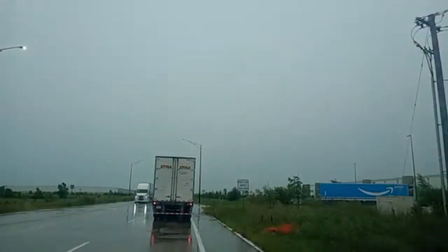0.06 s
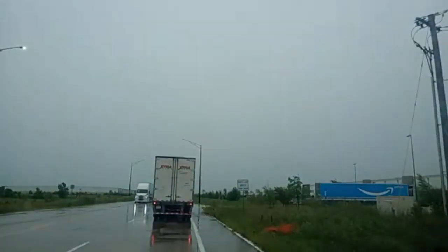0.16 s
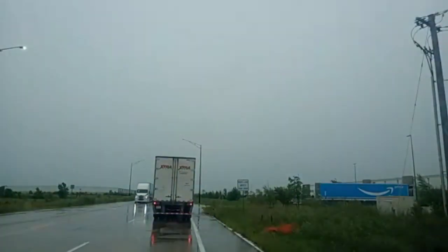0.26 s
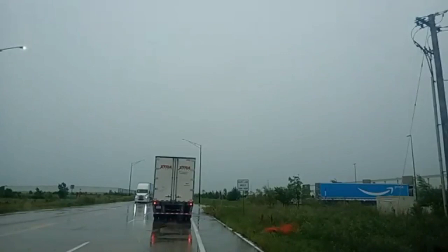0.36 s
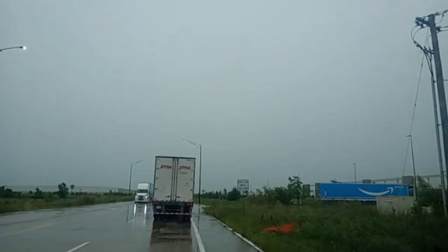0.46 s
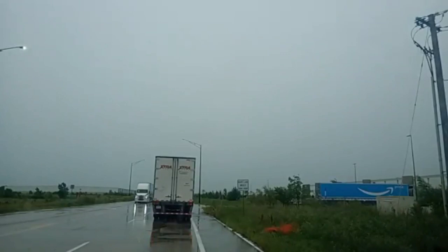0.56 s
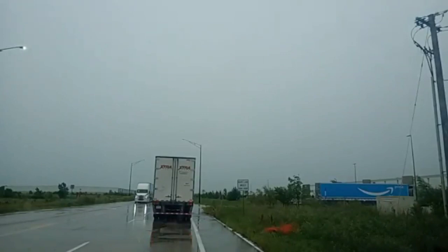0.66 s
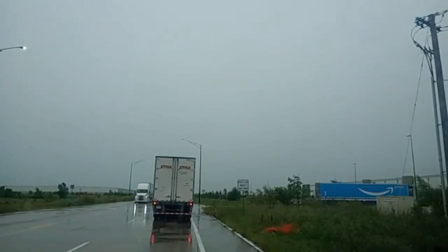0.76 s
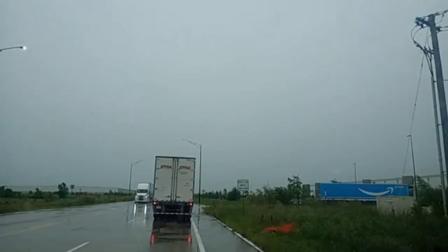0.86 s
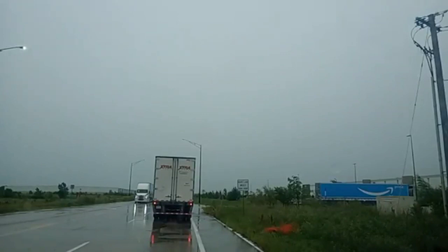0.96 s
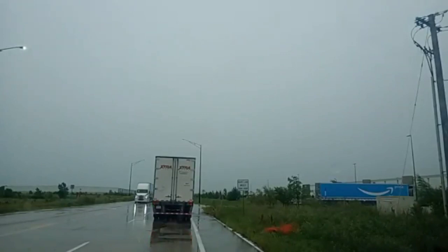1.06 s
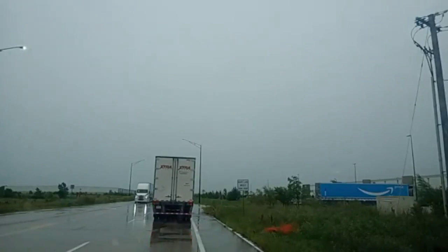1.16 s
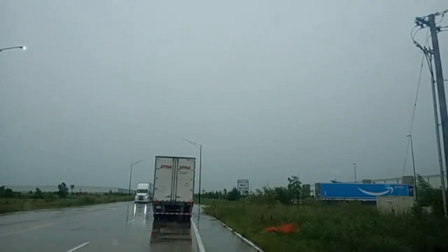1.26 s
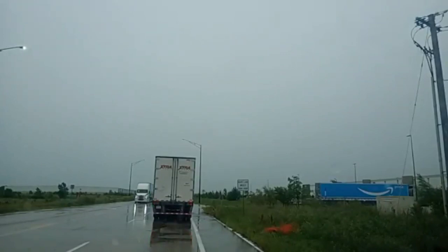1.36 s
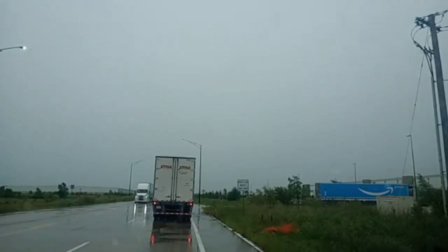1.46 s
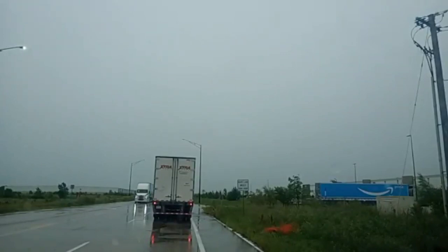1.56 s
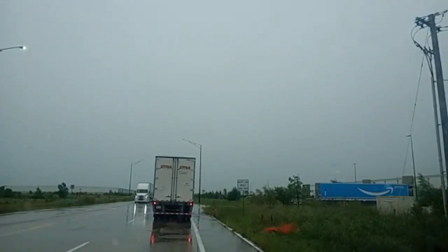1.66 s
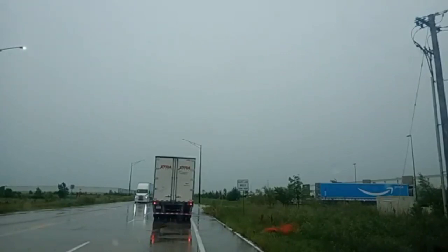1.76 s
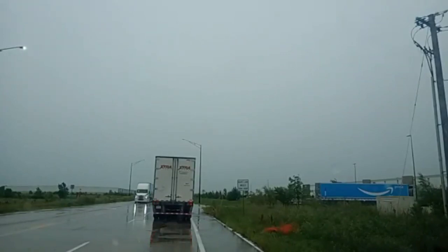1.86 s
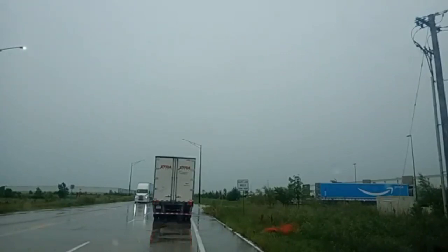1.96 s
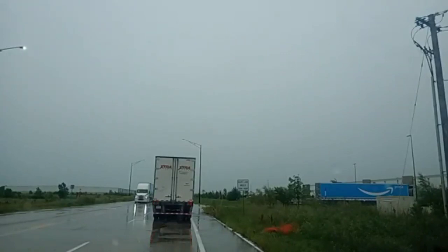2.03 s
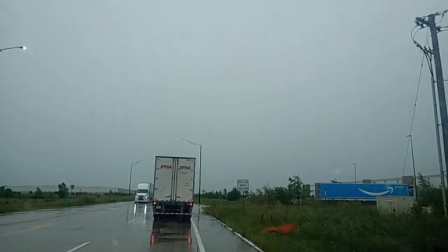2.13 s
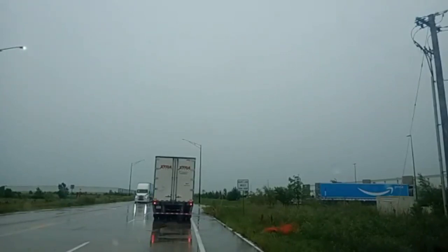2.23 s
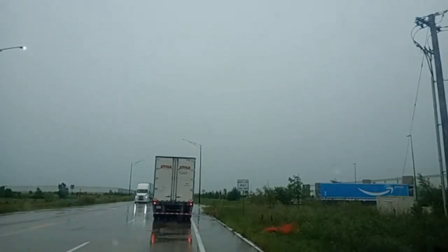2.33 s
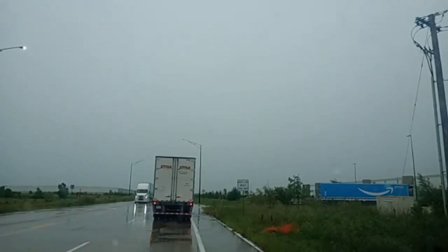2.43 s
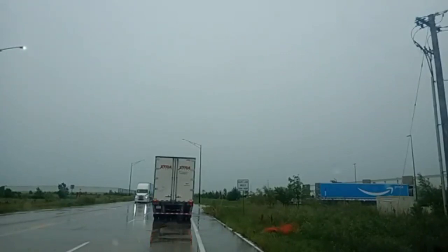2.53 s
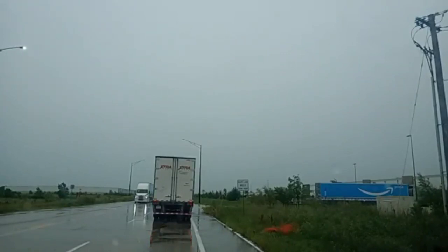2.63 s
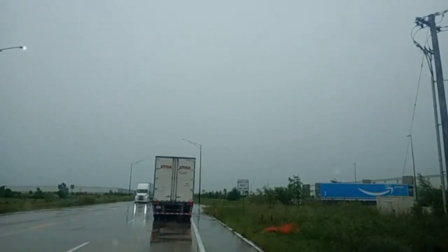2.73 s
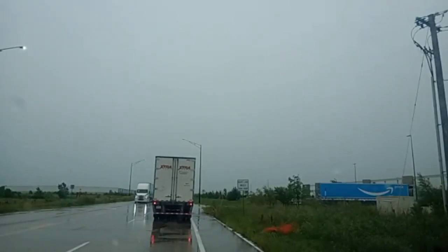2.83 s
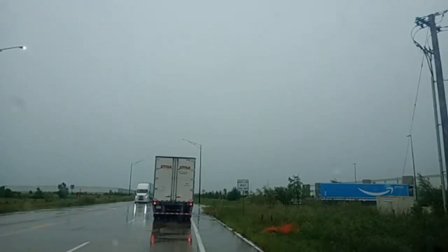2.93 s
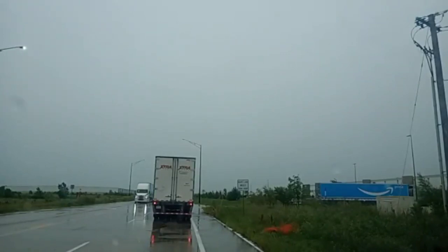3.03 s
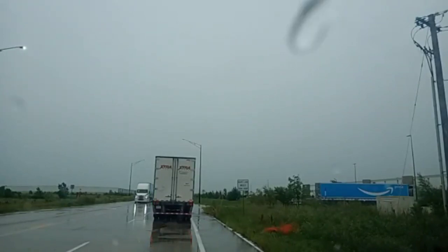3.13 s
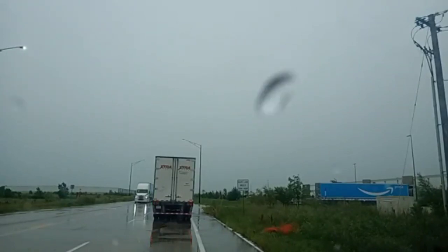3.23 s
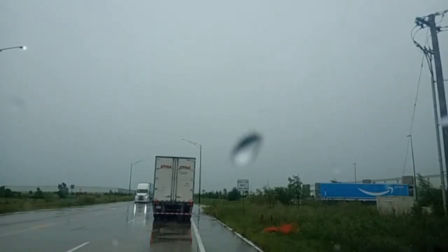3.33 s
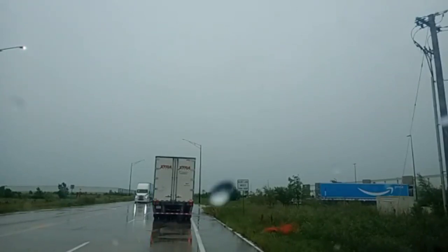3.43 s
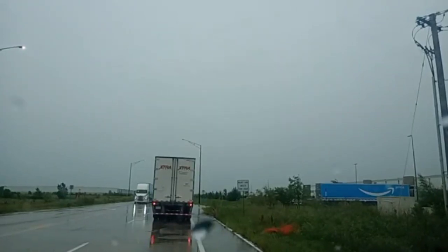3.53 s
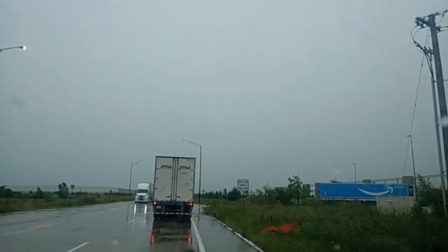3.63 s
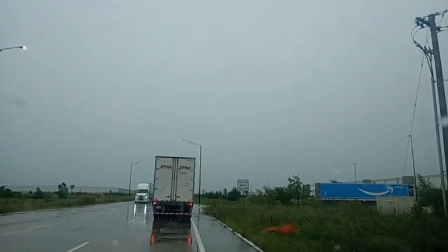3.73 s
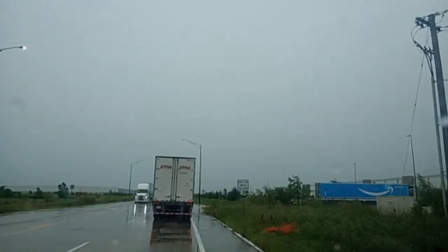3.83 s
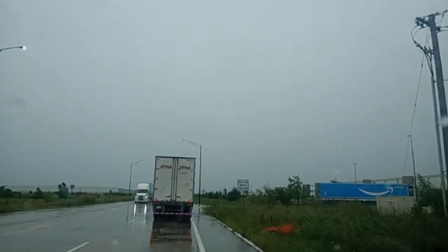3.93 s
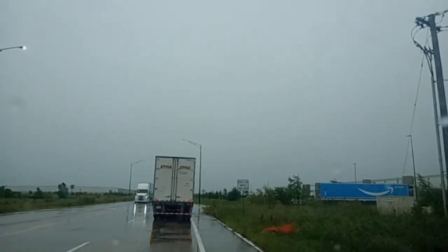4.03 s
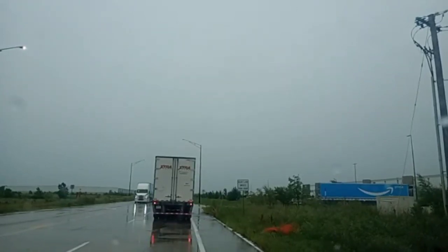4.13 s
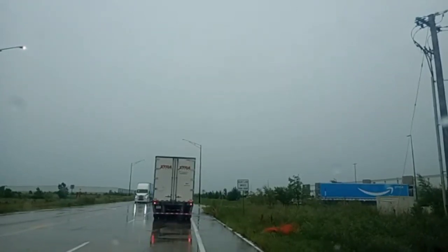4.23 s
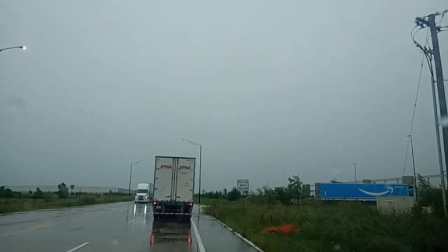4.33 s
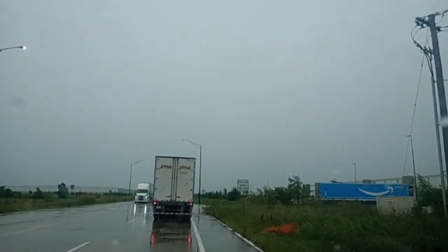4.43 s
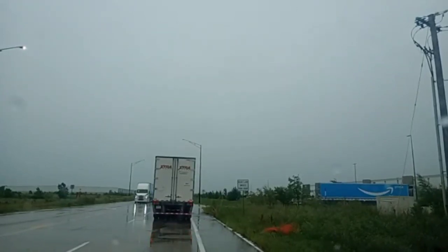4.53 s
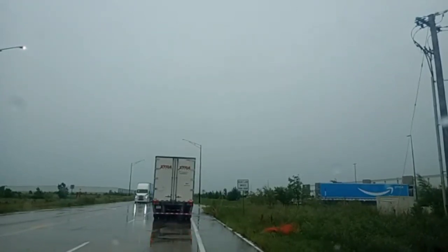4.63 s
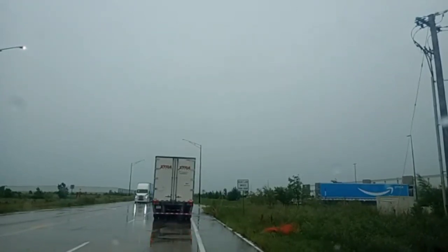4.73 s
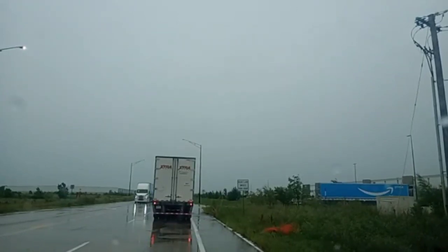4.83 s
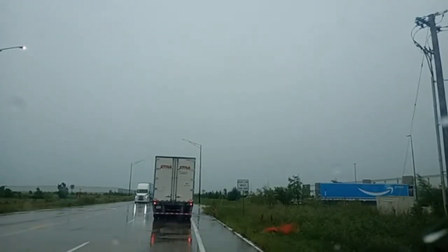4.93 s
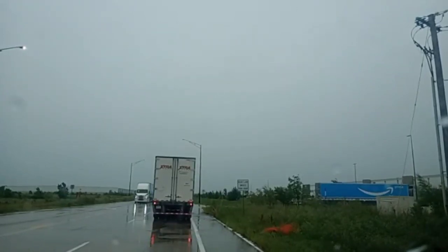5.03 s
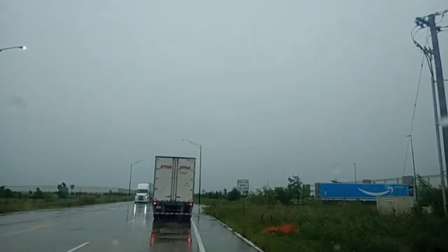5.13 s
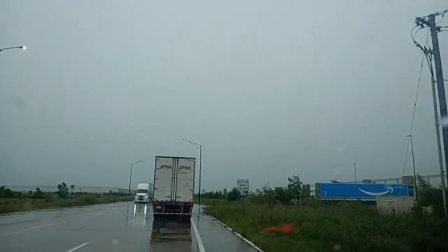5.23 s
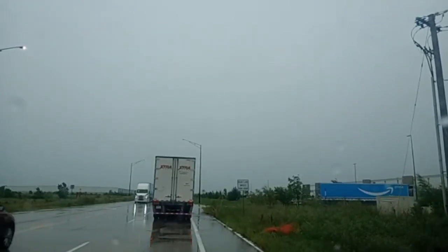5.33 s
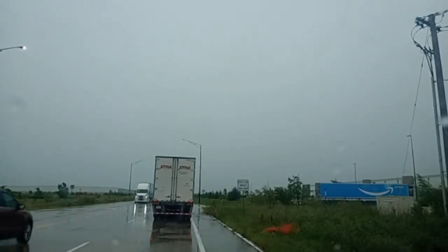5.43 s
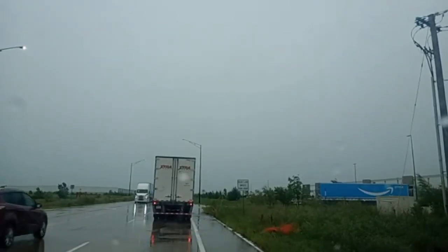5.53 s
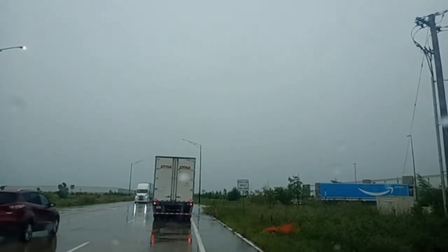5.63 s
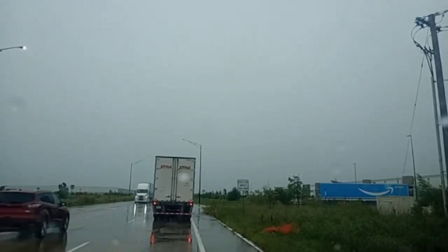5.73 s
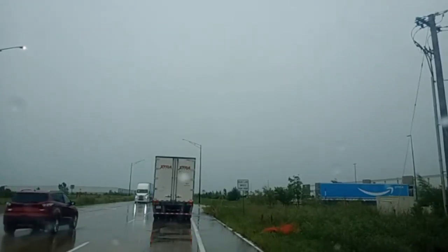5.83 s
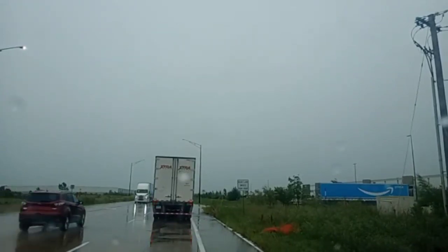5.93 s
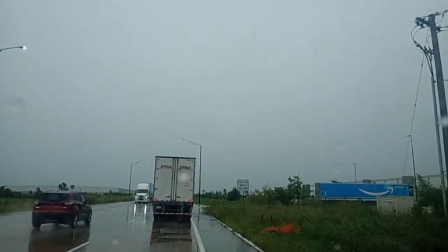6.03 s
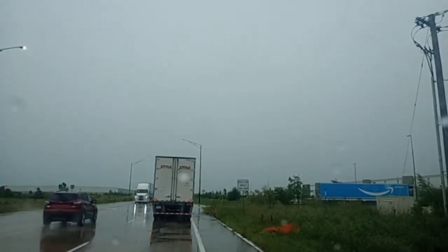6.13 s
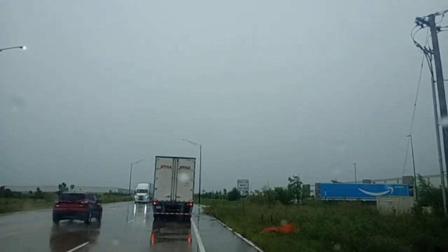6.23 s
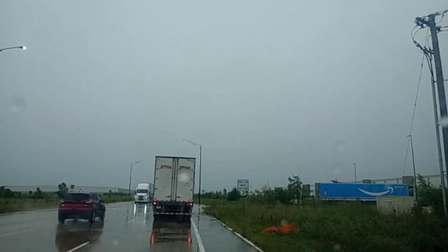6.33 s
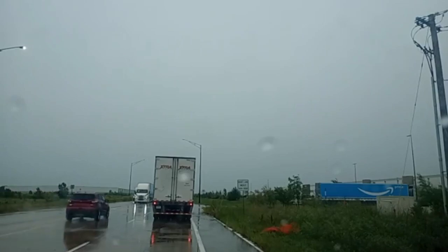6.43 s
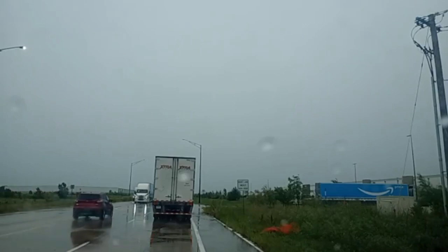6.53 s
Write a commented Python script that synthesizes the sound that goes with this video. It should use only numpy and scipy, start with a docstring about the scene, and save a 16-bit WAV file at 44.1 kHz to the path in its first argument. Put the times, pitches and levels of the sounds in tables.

```python
"""A wiper blade judders to rest and the cowl thrums out, heard inside a parked car in light rain;
then drops tap the windshield over a thin patter and the low murmur of the cabin.
The blade is a stick-slip pulse train driving body resonances; each drop is a short push that rings
glass modes and shapes noise; the patter and murmur are speckled noise with drawn levels.
A small microphone hears little above 7 kHz."""
import sys
import numpy as np
from scipy import signal
from scipy.fft import rfft, irfft, next_fast_len
from scipy.io import wavfile
from scipy.ndimage import uniform_filter1d, map_coordinates

SR = 44100
rng = np.random.default_rng(int(sys.argv[2]) if len(sys.argv) > 2 else 0)


def unload_audio(sound):
    """Save the sound as a 16-bit wav file, at the path given as the first command line argument."""
    columns = np.transpose(np.atleast_2d(sound))
    # keep every value between -1 and 1, then stretch to whole-number steps
    steps = np.round(np.clip(columns, -1, 1) * 32767)
    wavfile.write(sys.argv[1], SR, steps.astype(np.int16))


N = 290178
LEAD = SR // 30  # samples computed ahead of each landing

# Spectrum of drops on the glass: (frequency [Hz], relative density [dB per Hz])
GLASS = [(180, -53.5), (300, -16), (433, -17.5), (659, -10.5), (795, -12.5), (890, -7), (1030, -22.5),
         (1500, -22.5), (1800, -28), (2340, -56), (3960, -120)]
# Spectrum of splashing water: (frequency [Hz], relative density [dB per Hz])
SPLASH = [(650, -28.5), (1100, 3.5), (1580, -8), (2070, 0), (2260, 0.5), (2380, 3), (2600, -3), (2720, -2),
          (2940, -0.5), (4060, -6), (4600, -29), (5980, -42), (10100, -120)]
# Spectrum of the finest spray: (frequency [Hz], relative density [dB per Hz])
FIZZ = [(2530, -34), (4300, -13), (4430, -13.5), (4970, -17.5), (6460, -20), (10900, -120)]


def amp(db):
    """Amplitude is ten to the power of level over 20: the gain of a level in dB."""
    return 10 ** (np.asarray(db) / 20)


def unit(x):
    """Power normalisation: x at rms 1."""
    return x / np.sqrt(np.mean(x ** 2) + 1e-20)


def peak(x):
    """Short-time power normalisation: x with its loudest few milliseconds at rms 1."""
    return x / np.sqrt(np.max(uniform_filter1d(x ** 2, size=200)))


def curves(rows):
    """Linear interpolation in time: one value per sample for each column after the time."""
    times, *columns = np.transpose(rows)
    return [np.interp(np.arange(N) / SR, times, column) for column in columns]


def filtered(x, response):
    """Linear filtering: the spectrum of x times a complex response of frequency."""
    size = next_fast_len(len(x) + 4096)
    spectrum = rfft(x, size) * response(np.fft.rfftfreq(size, 1 / SR))
    return irfft(spectrum, size)[:len(x)]


def colour(points):
    """Spectral envelope: the gain of (Hz, dB) points joined on a log frequency axis."""
    f, db = np.transpose(points)
    return lambda hz: amp(np.interp(np.log(hz + 1), np.log(f + 1), db))


def spot(spectrum, uneven_db, step_hz):
    """Modal excitation depends on position: every landing spot gives the spectrum random peaks."""
    knots = rng.standard_normal(128)
    uneven = lambda hz: np.interp(hz / step_hz, np.arange(len(knots)), knots)
    return lambda hz: colour(spectrum)(hz) * amp(uneven_db * uneven(hz))


def resonant(modes):
    """Modal superposition: the causal response of (Hz, width Hz, dB) modes of alternating sign."""
    def mode(f, centre, width, db):
        return amp(db) * 1j * f * width / (centre * centre - f * f + 1j * f * width)
    return lambda f: sum((-1) ** k * mode(f, *row) for k, row in enumerate(modes))


def speckled(spectrum, patchy_db, span_hz, span_s, tick_db, ticks):
    """Superposed small taps blur into noise that ticks and holds short narrow specks; rms 1."""
    knot_positions = np.arange(N + 512) * ticks / SR  # ticks: knots per second
    beat = map_coordinates(rng.standard_normal(N // 100), [knot_positions])
    noise = amp(tick_db * beat) * rng.standard_normal(N + 512)
    z = signal.stft(noise, nperseg=512)[2]
    field = rng.standard_normal(z.shape)
    # smooth the random field over frequency, then over time
    for axis, span in enumerate((span_hz * 512 / SR, span_s * SR / 256)):
        bell = np.exp(-.5 * (np.arange(-8, 9) / span) ** 2)
        field = signal.fftconvolve(field, np.expand_dims(bell, 1 - axis), mode="same")
    patchy = signal.istft(z * amp(patchy_db * unit(field)), nperseg=512)[1][:N]
    return unit(filtered(patchy, colour(spectrum)))


def contact(rise_s, spread_s):
    """Impact force: seconds around a landing, and a push that swells, peaks and spreads away."""
    t = (np.arange(SR // 6) - LEAD) / SR
    width = np.where(t < .002, rise_s, spread_s)
    # the drop breaks up unevenly
    splinters = map_coordinates(rng.standard_normal(64), [np.clip(t * 130, 0, 60)])
    return t, np.exp(-((t - .002) / width) ** 2) * amp(2.0 * (splinters - splinters[LEAD]))


def ring(t, push, hz, waver, width_hz):
    """Forced resonance: a push of randomly walking phase drives one mode, which rings on briefly."""
    walk = np.cumsum(rng.standard_normal(len(t))) / np.sqrt(SR)
    phase = 2 * np.pi * (hz * t + rng.random()) + waver * walk  # waver: radians per root second
    return peak(filtered(push * np.sin(phase), resonant([(hz, width_hz, 0)])))


def patter():
    """Incoherent superposition: drops too small to tell apart, spray, and rain in the body shell."""
    # Levels: (time [s], patter on the glass [dB], fine spatter [dB], cabin murmur [dB])
    patter_levels = [(0.15, -69, -78, -57), (0.44, -63, -71, -65), (0.6, -67, -77, -68),
                     (0.78, -69, -75, -66), (0.95, -69, -83, -67), (1.22, -69, -70, -71),
                     (1.44, -71, -79, -73), (1.67, -66, -71.5, -70), (1.87, -71.5, -81.5, -71.5),
                     (2.12, -74.5, -77.5, -70), (2.48, -63.5, -71.5, -68), (2.76, -68, -76, -70.5),
                     (2.96, -70.5, -77.5, -68.5), (3.32, -69, -72, -66.5), (3.64, -61.5, -67.5, -63),
                     (3.82, -59.5, -67.5, -65), (4.0, -64.5, -79.5, -66), (4.27, -75, -80, -63.5),
                     (4.61, -67, -76.5, -62.5), (4.97, -71, -80, -68), (5.2, -63.5, -71.5, -71),
                     (5.38, -62, -67.5, -62), (5.61, -64, -67, -66), (5.81, -69, -66, -67.5),
                     (5.95, -63.5, -71, -61.5), (6.31, -73, -75.5, -65.5), (6.58, -69, -78.5, -72.5)]
    # Puffs of fine spray on the glass: (time [s], half length to 1/e [s], level [dB])
    sprays = [(0.457, 0.12, -80.5), (0.805, 0.072, -67), (1.192, 0.13, -85.5), (2.542, 0.022, -83),
              (3.51, 0.081, -81), (3.964, 0.15, -80), (5.35, 0.1, -81), (5.615, 0.047, -68),
              (5.741, 0.05, -67), (5.844, 0.028, -74), (6.5, .08, -94)]
    # Spectrum of the cabin murmur: (frequency [Hz], relative density [dB per Hz])
    cabin_spectrum = [(15, -45.5), (25, -7.5), (60, -11.5), (81, -12.5), (188, 6), (271, -4.5), (321, -2),
                      (366, -12), (450, -6), (580, -40.5), (990, -120)]
    mist_db, mist_grows = -87, .7  # mean level of the finest hiss, dB per dB of the spatter
    t = np.arange(N) / SR
    glass_db, splash_db, cabin_db = curves(patter_levels)
    swell_db = splash_db - splash_db.mean()
    mist = amp(mist_db + mist_grows * swell_db)
    spray = sum(amp(db) * np.exp(-((t - s) / half) ** 2) for s, half, db in sprays)
    glass = speckled(GLASS, patchy_db=3, span_hz=60, span_s=.01, tick_db=2.5, ticks=50)
    splash = speckled(SPLASH, patchy_db=3.5, span_hz=70, span_s=.007, tick_db=3.5, ticks=110)
    fizz = speckled(FIZZ, patchy_db=3, span_hz=100, span_s=.008, tick_db=3.5, ticks=120)
    cabin = speckled(cabin_spectrum, patchy_db=2.2, span_hz=50, span_s=.02, tick_db=1.5, ticks=20)
    on_glass = amp(glass_db) * glass + amp(splash_db) * splash
    return on_glass + (mist + spray) * fizz + amp(cabin_db) * cabin


def droplets():
    """Impulsive excitation: a droplet pings one high mode inside a short spatter and fizz."""
    # Landings: (time [s], level before the common trim [dB], pitch [Hz],
    #            fizz re ping and spatter [dB], spread [s])
    landings = [(0.1968, -45.5, 2450, -30, 0.0047), (0.2885, -53, 2600, -27, 0.0065),
                (0.307, -57, 1480, -7, 0.013), (0.339, -42, 3960, -12, 0.0071),
                (0.393, -46, 3480, -32, 0.011), (0.4195, -52, 3480, -22, 0.0051),
                (0.49, -58, 3120, -25, 0.009), (0.51, -47, 1480, -31, 0.0099),
                (0.537, -50, 3360, -30, 0.013), (0.6542, -46, 2236, -14, 0.024),
                (0.6907, -58, 2720, 7, 0.015), (0.7446, -51.5, 3450, -26, 0.005),
                (0.7746, -63, 4080, -12, 0.009), (0.8033, -58, 3920, 14.5, 0.0045),
                (0.853, -51, 3640, -15, 0.0096), (0.9488, -52, 3000, -26, 0.021),
                (1.0096, -57, 3440, -2.5, 0.017), (1.1057, -53, 3340, -28, 0.027),
                (1.1343, -48, 1510, -32, 0.017), (1.176, -46.5, 3300, -28, 0.017),
                (1.267, -45.5, 2750, -29.5, 0.0064), (1.3665, -56, 4100, -14, 0.0034),
                (1.3975, -52.5, 2650, -17.5, 0.0049), (1.4747, -48.5, 1307, -32, 0.023),
                (1.6052, -47, 1417, -29, 0.027), (1.6384, -48.5, 2150, -27, 0.0079),
                (1.6621, -58, 3300, -27, 0.0054), (1.6862, -53.5, 1670, -29, 0.014),
                (1.7746, -51, 1310, -24.5, 0.011), (1.791, -47.5, 2300, -29, 0.009),
                (1.8312, -57, 2470, -21.5, 0.016), (2.0093, -63, 3340, -27.5, 0.006),
                (2.0872, -57.5, 2350, -24, 0.013), (2.2192, -44, 2130, -23, 0.027),
                (2.2293, -39, 1360, -13.5, 0.0068), (2.257, -46, 1390, -40, 0.0075),
                (2.2944, -57, 2670, -17, 0.019), (2.353, -49.5, 2194, -33, 0.02),
                (2.4083, -47.5, 1476, -38, 0.017), (2.5098, -55.5, 3210, 4.5, 0.011),
                (2.5433, -48.5, 3320, -19, 0.011), (2.5916, -52, 3290, -30, 0.019),
                (2.6544, -41, 1405, -33, 0.0045), (2.7075, -46.5, 3400, -8.5, 0.0035),
                (2.7932, -57, 2710, -16.5, 0.0057), (2.9123, -54, 2550, -8.5, 0.0067),
                (3.031, -56, 1430, -17, 0.027), (3.0535, -48.5, 2910, -9, 0.0099),
                (3.1541, -40.5, 2640, -12, 0.027), (3.1736, -38.5, 1494, -14, 0.016),
                (3.1951, -42.5, 1310, -12, 0.019), (3.261, -38.5, 1270, -10, 0.0084),
                (3.3194, -62, 2160, -25, 0.008), (3.3866, -37, 1694, -32, 0.012),
                (3.4111, -41, 2300, -29, 0.015), (3.445, -46.5, 2780, -26, 0.009),
                (3.468, -39, 2740, -11, 0.003), (3.51, -60, 1950, -19, 0.009),
                (3.5425, -51, 2830, -28, 0.009), (3.5685, -46.5, 1250, -30, 0.01),
                (3.578, -42.5, 2480, -8, 0.013), (3.63, -44.5, 1316, -14, 0.009),
                (3.6585, -48, 1340, -15, 0.009), (3.6912, -46.5, 2330, -11, 0.027),
                (3.7241, -39.5, 1468, -13.5, 0.017), (3.779, -54, 1550, -29, 0.0051),
                (3.8267, -43, 1280, -33, 0.012), (3.8572, -47, 1370, -17, 0.0078),
                (3.9165, -47, 1300, -33, 0.01), (3.9496, -47.5, 1323, -26, 0.009),
                (3.9802, -39.5, 2256, -19, 0.01), (4.0362, -50, 3760, -4, 0.009),
                (4.186, -50, 2300, -35, 0.015), (4.2225, -54, 2435, -10, 0.0098),
                (4.343, -69, 2750, -19, 0.011), (4.376, -60.5, 2850, -8, 0.0064),
                (4.4687, -34.5, 1324, -26, 0.01), (4.536, -52, 1570, -27, 0.0077),
                (4.558, -50, 2190, -35, 0.02), (4.6047, -46, 3300, -33, 0.0068),
                (4.6743, -45, 1485, -40, 0.027), (4.708, -52, 3280, -32, 0.012),
                (4.788, -53, 1450, -28, 0.013), (4.8599, -67, 3400, -22, 0.0063),
                (4.951, -59, 1350, -30, 0.016), (5.0883, -57, 4250, -16, 0.026),
                (5.1038, -52.5, 1416, -20, 0.014), (5.2106, -37, 3000, -35, 0.012),
                (5.2356, -46, 2840, -19, 0.015), (5.2804, -45, 3810, -30, 0.017),
                (5.3114, -48, 3020, -26, 0.007), (5.3545, -36.5, 3830, -10, 0.013),
                (5.3665, -25, 1542, -19, 0.015), (5.441, -47, 2140, -27, 0.009),
                (5.5074, -55, 3000, -21, 0.009), (5.535, -55, 3140, -13, 0.009),
                (5.5834, -56, 2940, -8, 0.025), (5.6115, -43, 1370, -15, 0.0079),
                (5.6782, -41.5, 3980, -17, 0.009), (5.702, -47, 3630, -4, 0.0071),
                (5.7166, -50, 2320, -1, 0.011), (5.729, -41.5, 1500, -14, 0.017),
                (5.7948, -46.5, 1530, -15, 0.0068), (5.8346, -58, 1900, -7, 0.014),
                (5.8599, -37, 1290, -10.5, 0.0068), (5.9912, -49, 1360, -25, 0.0076),
                (6.0876, -53.5, 2380, -6, 0.027), (6.2158, -61, 1550, -11, 0.0081),
                (6.3115, -53, 2310, -28, 0.009), (6.42, -61, 3980, -13, 0.0069),
                (6.4708, -49.5, 2420, -17.5, 0.021), (6.4977, -51.5, 1324, -34, 0.0079),
                (6.5151, -53.5, 1960, -28, 0.016)]
    rise_s, trim_db = 0.0037, -13  # shared by all droplets
    out = np.zeros(N + SR)
    for s, db, hz, fizz_db, spread_s in landings:
        t, push = contact(rise_s, spread_s)
        spatter_noise, fizz_noise = push * rng.standard_normal((2, len(t)))
        ping = ring(t, push, hz, waver=38, width_hz=230)
        spatter = peak(filtered(spatter_noise, spot(SPLASH, uneven_db=7.5, step_hz=219.5)))
        fizz = peak(filtered(fizz_noise, colour(FIZZ)))
        sound = ping + amp(-3.5) * spatter + amp(fizz_db) * fizz
        out[round(s * SR) - LEAD:][:len(t)] += amp(db + trim_db) * sound
    return out[:N]


def drops():
    """Modal excitation by impact: a big drop rings a glass mode, rattles others, splashes and thuds."""
    # Landings: (time [s], level before the common trim [dB], glass pitch [Hz],
    #            panel thud re glass mode [dB], splash re glass mode [dB], spread [s])
    landings = [(0.282, -56, 847, -10, -11, 0.033), (0.309, -42.5, 800, -9, -7.5, 0.037),
                (0.424, -43.5, 460, -15, -12, 0.012), (0.452, -48, 409, -9, -31, 0.04),
                (0.52, -42, 753, -31, -39, 0.029), (0.662, -49.5, 850, -13, -11, 0.013),
                (0.688, -53.5, 546, -16, 0, 0.03), (1.051, -54, 811, -15, -9, 0.017),
                (1.137, -48, 866, -10.5, -11, 0.016), (1.206, -52.5, 875, -7, -3, 0.033),
                (1.266, -55, 396, -11.5, 4, 0.012), (1.368, -55.5, 953, -10.5, -5.5, 0.0095),
                (1.481, -50.5, 915, -18, -7, 0.028), (1.613, -49, 942, -20, -19, 0.031),
                (1.649, -51, 908, -27, -14, 0.052), (1.681, -42.5, 917, -28.5, -25, 0.028),
                (1.775, -48.5, 884, -5, -10, 0.029), (1.796, -44.5, 814, -17, -24, 0.024),
                (1.861, -57.5, 877, -3, -9.5, 0.023), (2.012, -53, 864, -12, -23.5, 0.016),
                (2.083, -47, 933, -21, -21, 0.011), (2.236, -36.5, 557, -24, -20.5, 0.04),
                (2.343, -53, 588, -7, -6, 0.034), (2.449, -52.5, 833, -6, -4, 0.0092),
                (2.581, -45, 608, -19, -5.5, 0.013), (2.595, -44.5, 564, -17, -7, 0.05),
                (2.649, -42.5, 594, -6.5, -16, 0.048), (2.714, -51, 690, -26, -3, 0.012),
                (2.754, -50.5, 868, -14.5, -20, 0.026), (2.932, -49, 841, -19.5, -21.5, 0.015),
                (2.948, -50.5, 830, -14, -26, 0.013), (3.156, -41, 737, -20, -9, 0.052),
                (3.172, -41, 840, -6.5, -8, 0.043), (3.188, -38, 594, -26, -17, 0.036),
                (3.245, -48.5, 850, -20, -14, 0.046), (3.261, -46.5, 643, -13, -15, 0.022),
                (3.377, -38, 604, -3, -8.5, 0.044), (3.39, -32, 628, -7, -8, 0.032),
                (3.591, -43, 704, -21, -19, 0.015), (3.61, -45, 550, -14, -22, 0.02),
                (3.634, -46.5, 630, -15, -10, 0.039), (3.729, -35, 879, -22, -8, 0.026),
                (3.758, -36.5, 844, -22, -29, 0.018), (3.828, -43, 639, -20, -7, 0.011),
                (3.85, -44, 754, -17, -14, 0.032), (3.95, -36.5, 895, -6, -14, 0.058),
                (4.19, -51.5, 710, 3, -15, 0.025), (4.234, -49.5, 678, 0, -12, 0.033),
                (4.346, -55, 563, -10, -7, 0.03), (4.469, -30.5, 623.7, -25, -30, 0.035),
                (4.495, -41, 550, -11, -33, 0.038), (4.538, -44, 880, -22, -19, 0.012),
                (4.562, -41, 836, -22, -25, 0.023), (4.589, -38, 650, -26, -21, 0.023),
                (4.675, -50.5, 594, -11, 0, 0.045), (4.775, -56.5, 912, 5.5, -12, 0.016),
                (4.946, -52.5, 806, 2, -12, 0.051), (4.976, -46, 788, -3, -21, 0.013),
                (5.004, -49, 765, -19, -30, 0.029), (5.109, -52, 900, -22, -7, 0.015),
                (5.198, -49, 851, -7, -5, 0.025), (5.218, -46.5, 876, 8, 2, 0.023),
                (5.251, -44, 660, -1, -0.5, 0.04), (5.274, -39.5, 511, -19, -2, 0.026),
                (5.307, -43.5, 758, -27, -4.5, 0.074), (5.371, -23.5, 668, -17, -7.5, 0.032),
                (5.447, -40, 407, -18, -11, 0.019), (5.554, -60, 910, 14, -4, 0.031),
                (5.603, -55, 974, -16, -7, 0.018), (5.632, -52, 710, -17, -11, 0.025),
                (5.666, -48.5, 724, -25, 0, 0.028), (5.685, -41.5, 823, -20, -18, 0.018),
                (5.719, -40, 822, -11, -8.5, 0.053), (5.782, -46, 827, 5, -5, 0.023),
                (5.796, -46, 818, -9, -20, 0.055), (5.853, -37.5, 859, -5, -15, 0.032),
                (5.885, -42, 536, 0, -14, 0.04), (5.988, -56.5, 815, 9, -11, 0.045),
                (6.085, -57.5, 608, -13, 1.5, 0.044), (6.209, -58.5, 565, 8, -6, 0.034),
                (6.308, -54.5, 610, 0, -19, 0.025), (6.465, -52, 635, -22.5, -10.5, 0.049),
                (6.506, -52, 504, -18, -10, 0.021)]
    rise_s, trim_db = 0.0063, -8.5  # shared by all big drops
    out = np.zeros(N + SR)
    for s, db, glass_hz, thud_db, splash_db, spread_s in landings:
        t, push = contact(rise_s, spread_s)
        glass_noise, thud_noise, splash_noise = push * rng.standard_normal((3, len(t)))
        mode = ring(t, push, glass_hz, waver=20.3, width_hz=710)
        onset = 1 + 0.36 * np.exp(-((t - .001) / 0.01) ** 2)
        rattle = peak(filtered(glass_noise * onset, spot(GLASS, uneven_db=3.5, step_hz=91.4)))
        thud = peak(filtered(thud_noise, lambda f: resonant([(230, 200, 0)])(f) ** 2))
        crack = 1 + 1.1 * np.exp(-(t / 0.002) ** 2)  # the first instant is the sharpest
        splash = peak(filtered(crack * splash_noise, spot(SPLASH, uneven_db=2.5, step_hz=163.7)))
        fizz = peak(filtered(splash_noise, colour(FIZZ)))
        sound = mode + amp(-1.5) * rattle + amp(thud_db) * thud
        sound += amp(splash_db) * (splash + amp(-18.0) * fizz)
        out[round(s * SR) - LEAD:][:len(t)] += amp(db + trim_db) * sound
    return out[:N]


def wiper():
    """Stick-slip friction: the rubber slips unevenly; each slip pushes the cowl and knocks the arm."""
    # Blade: (time [s], slip rate [1/s], thrum [dB], overtone [dB re thrum],
    #         knock [dB re thrum], wet rasp [dB re thrum])
    blade = [(0.008, 100, -16.5, -2, -8.5, -29.5), (0.03, 109, -22.5, 6, -2.5, -26.5),
             (0.062, 120, -19.5, -12.5, -13.5, -36.5), (0.1, 135, -24, -10, -8, -26.5),
             (0.16, 147, -42, -6.5, -18, -20), (0.194, 150, -77.5, -4, -7, -1),
             (0.224, 100, -47.5, -10, -22, -49), (0.3, 106, -68.5, -12, -1, 6)]
    # Lowest, then next body resonances: (frequency [Hz], width [Hz], level [dB]), both squared below
    cowl_lowest, cowl_next = [(124, 110, 0)], [(230.8, 24, 1), (296, 35, -11.5)]
    # Wiper arm and glass resonances: (frequency [Hz], width [Hz], level [dB])
    arm_modes = [(370, 55, 7.5), (540, 37, 2), (610, 47, 1.5), (835, 91, -5.5), (992, 37, -5),
                 (1520, 57, -15)]
    # Spectrum of rubber on wet glass: (frequency [Hz], relative density [dB per Hz])
    rasp_spectrum = [(900, -42), (1300, -1), (1600, -11.5), (2200, -3), (2700, -13.5), (3300, -17),
                     (3900, -11.5), (4500, -25.5), (5500, -29), (7000, -26), (8000, -53)]
    jitter, scatter_db = .12, 1.5  # timing in slips, strength in dB (standard deviations)
    rate, thrum_db, overtone_db, knock_db, rasp_db = curves(blade)
    t = np.arange(N) / SR
    count = np.arange(1, 40)
    chance = rng.standard_normal((len(count), 2))
    # a slip falls where the integral of the rate reaches its count
    times = np.interp(count - 1.2 + jitter * chance[:, 0], np.cumsum(rate) / SR, t)
    slips = np.bincount((times * SR).astype(int), amp(scatter_db * chance[:, 1]), N)
    slips = filtered(slips, lambda f: np.exp(-(f / 1500) ** 2))  # rubber lets go softly

    def norm(x):  # by the spread over the first quarter second
        return x / np.std(x[:SR // 4])

    roughness = np.array([[.06], [.15], [.3]])  # noise in the push on cowl, overtone and arm
    drive = norm(slips) + roughness * rng.standard_normal((3, N))
    thrum = norm(filtered(drive[0], lambda f: resonant(cowl_lowest)(f) ** 2))
    overtone = norm(filtered(drive[1], lambda f: resonant(cowl_next)(f) ** 2))
    broad = resonant([(700, 1400, 0)])
    arm = norm(filtered(drive[2], lambda f: resonant(arm_modes)(f) * broad(f) ** 2))
    rasp = speckled(rasp_spectrum, patchy_db=3, span_hz=150, span_s=.012, tick_db=1.5, ticks=110)
    rest = np.clip((.33 - t) / 0.043, 0, 1)  # fades to zero as the blade parks
    mix = thrum + amp(overtone_db) * overtone + amp(knock_db) * arm + amp(rasp_db) * rasp
    return rest * amp(thrum_db) * mix


def scene():
    """Linear superposition of patter, droplets, drops and blade at one microphone."""
    return (patter() + droplets() + drops() + wiper())[None]


def record(dry):
    """Band limitation: the capsule loses the top, faint electronic hiss joins, a limit cuts both."""
    # Treble loss of the capsule: (frequency [Hz], gain [dB])
    capsule = [(7100, -0.5), (7600, -17.5), (9000, -41.5)]
    # Spectrum of the electronic hiss: (frequency [Hz], relative density [dB per Hz])
    hiss_spectrum = [(20, -6), (3500, 4), (6300, 3), (7400, -1), (9000, 0), (15500, -1)]
    top_hz = 15450
    hiss = amp(-91) * unit(filtered(rng.standard_normal(N), colour(hiss_spectrum)))
    heard = filtered(dry[0], colour(capsule))
    return filtered(heard + hiss, lambda hz: hz < top_hz)[None]


dry = scene()
out = record(dry)
unload_audio(out)
```